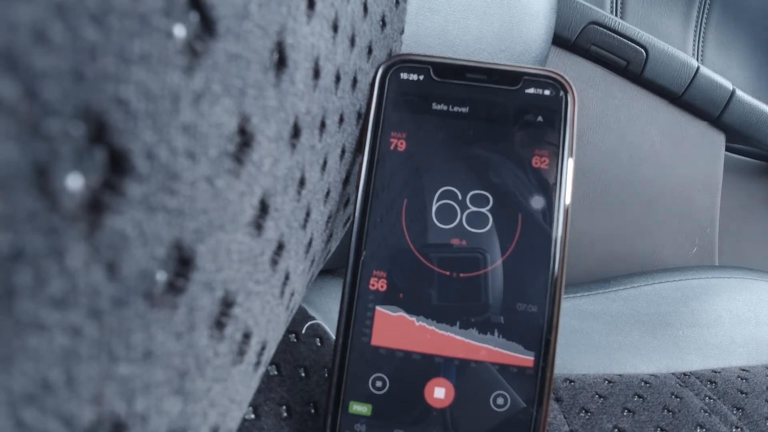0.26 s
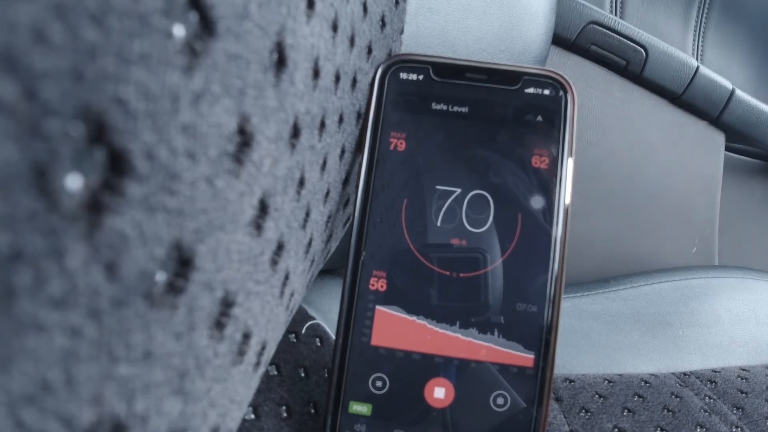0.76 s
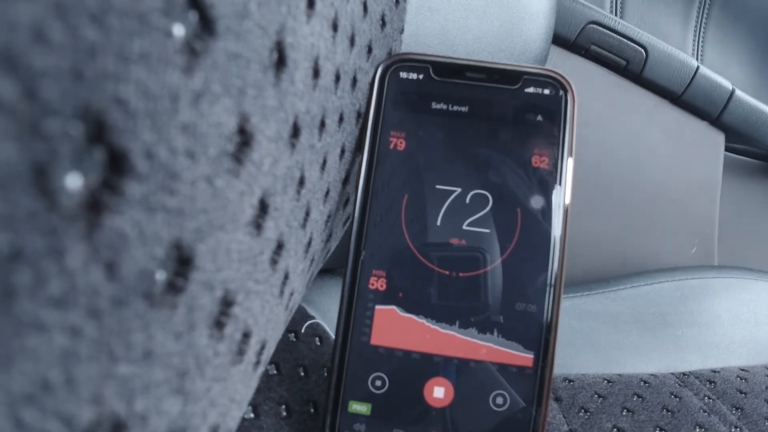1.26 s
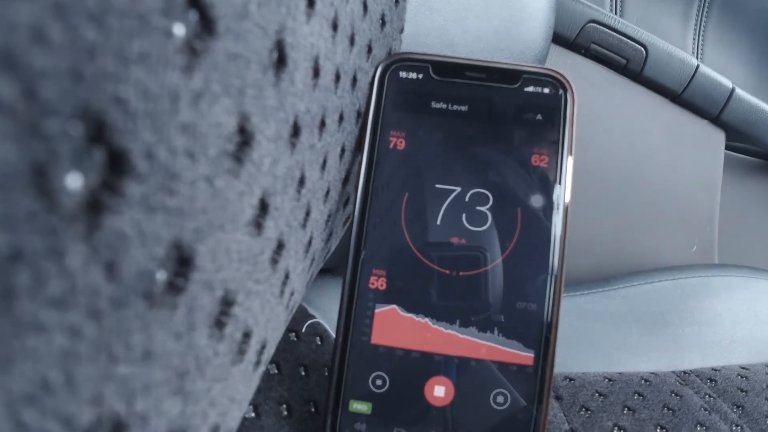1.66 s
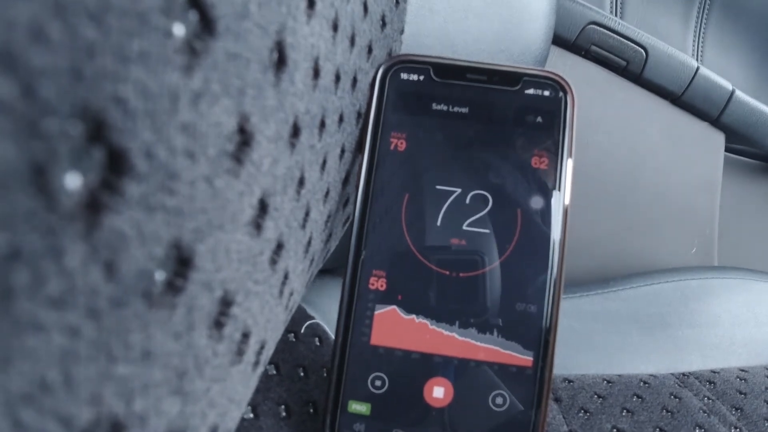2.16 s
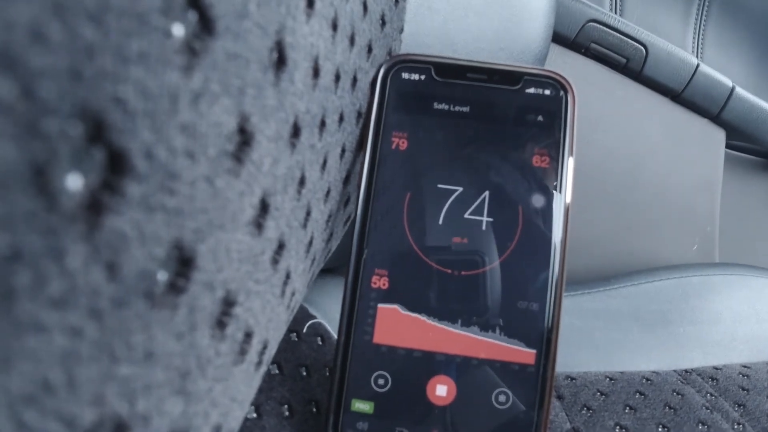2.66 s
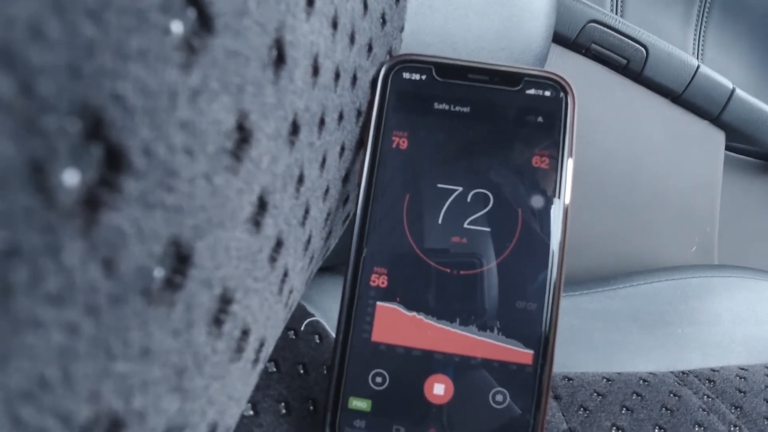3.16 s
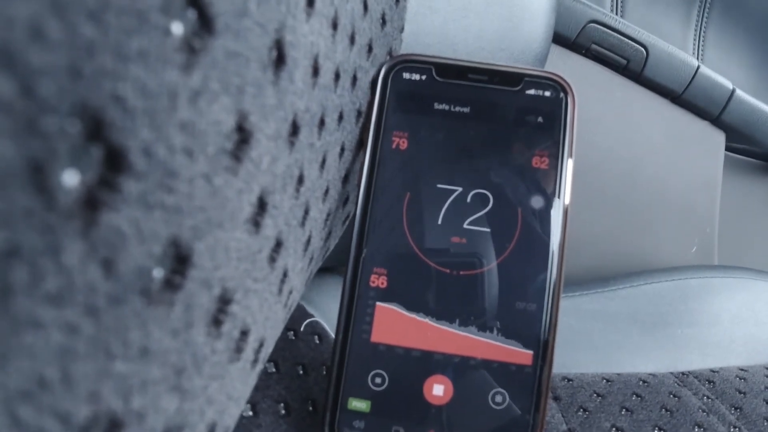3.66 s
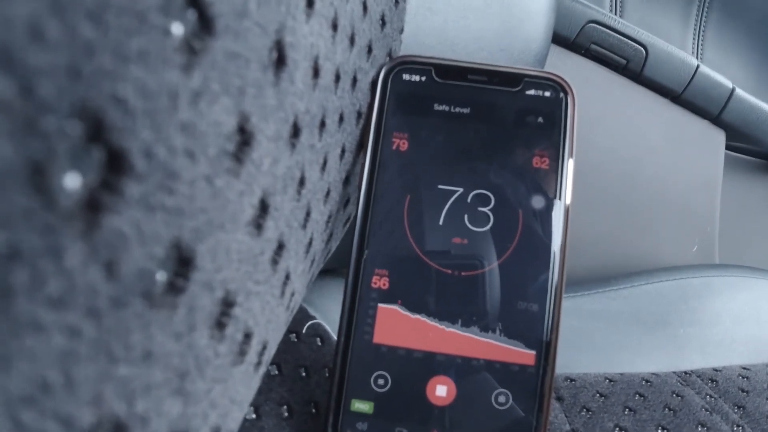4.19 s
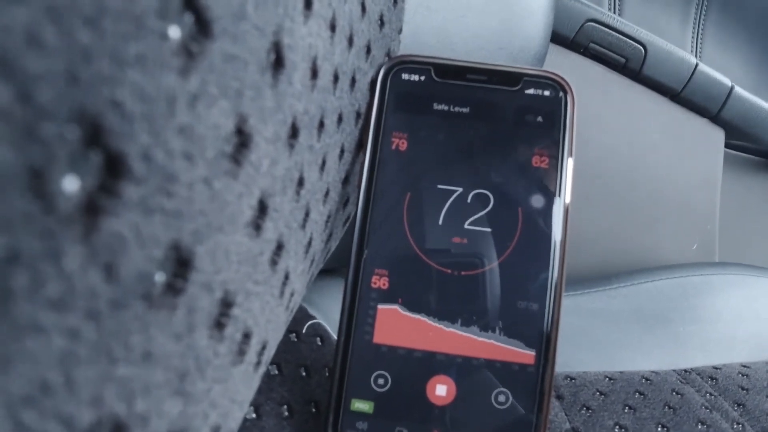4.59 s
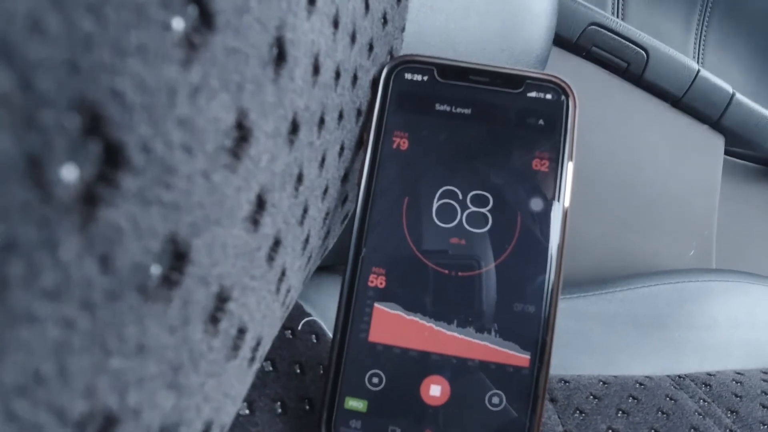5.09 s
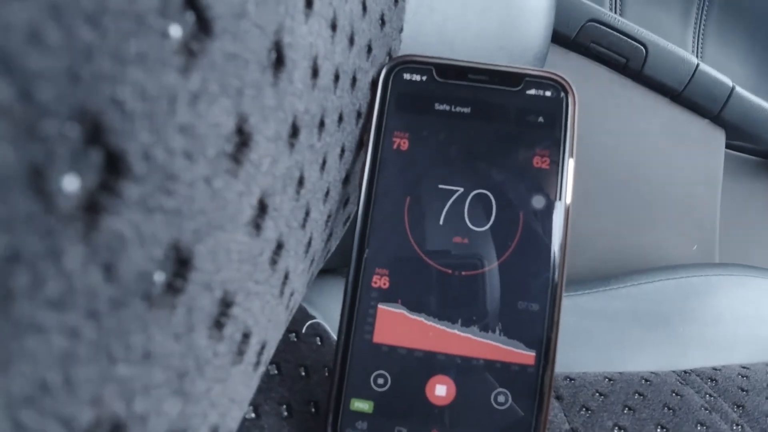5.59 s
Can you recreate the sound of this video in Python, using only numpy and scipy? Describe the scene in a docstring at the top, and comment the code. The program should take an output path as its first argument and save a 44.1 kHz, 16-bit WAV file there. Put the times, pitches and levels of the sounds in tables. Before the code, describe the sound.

Interior of a moving car, microphones resting close to the seat. A deep four-cylinder boom rises in pitch for two seconds, eases down, surges briefly after four seconds and dies away. Tyre rumble and body shake lie beneath. Small dry trim ticks and hollow plastic clacks sound close by; fabric rustling grows later, with the loudest clack near the end.

```python
"""A four-cylinder engine booms through the cabin of a moving car, pulls up, eases off and surges once more:
sine tones on its firing note and overtones. Close to the microphones trim ticks and hollow plastic clacks,
as ringing modes, the loudest clack near the end; something rustles against the seat in grainy noise, and
soft bands of noise swell and fade. Bumps boom as decaying sines, and under all this shaped noise shakes the
body and rumbles as the tyres, with faint wandering tones from the tread."""
import sys
import numpy as np
from scipy import signal
from scipy.fft import rfft, irfft
from scipy.io import wavfile
from scipy.ndimage import uniform_filter1d, minimum_filter1d

SR = 44100
rng = np.random.default_rng(int(sys.argv[2]) if len(sys.argv) > 2 else 0)


def materialize(psi):
    """Save the field psi as 16-bit PCM at rate SR to the path in sys.argv[1].

    A 1-D psi becomes a single channel; in a 2-D psi each row is a channel.
    """
    bounded = np.clip(np.atleast_2d(psi).T, -1, 1)
    quanta = np.round(bounded * 32767).astype(np.int16)
    wavfile.write(sys.argv[1], SR, quanta)


N = 257544
T = np.arange(N) / SR   # time in seconds


def from_db(db):
    """Decibels to gain."""
    return 10 ** (np.asarray(db) / 20)


def rms_one(x):
    """Scale to unit power."""
    return x / np.sqrt(np.mean(x ** 2) + 1e-20)


def in_time(rows):
    """Each column of a curve, read at every sample."""
    s, *columns = np.transpose(rows)
    return [np.interp(T, s, column) for column in columns]


def at_hz(points, hz):
    """Read a spectrum on a log-frequency axis."""
    f, value = np.transpose(points)
    return np.interp(np.log(np.maximum(hz, 1)), np.log(f), value)


def drift(rate_hz):
    """Smooth random wander of spread 1: noise through two equal poles at the given rate."""
    step = 40   # samples between points of the wander
    settle = 2000   # points dropped while the filter settles
    r = np.exp(-2 * np.pi * rate_hz * step / SR)
    noise = rng.standard_normal(N // step + settle + 2)
    slow = signal.lfilter([1], [1, -2 * r, r * r], noise)[settle:]
    return np.interp(np.arange(N) / step, np.arange(len(slow)), rms_one(slow))


def colour(x, spectrum):
    """Give a steady signal a spectrum."""
    gain = from_db(at_hz(spectrum, np.fft.rfftfreq(N, 1 / SR)))
    return irfft(rfft(x) * gain, N)


def resonate(x, hz, width_hz):
    """One resonance with gain 1 on top."""
    r = np.exp(-np.pi * width_hz / SR)
    zeros = np.array([1, 0, -1]) * (1 - r * r) / 2
    poles = [1, -2 * r * np.cos(2 * np.pi * hz / SR), r * r]
    return signal.lfilter(zeros, poles, x + 1e-18)   # the offset avoids slow, vanishingly small numbers


def body(x, modes):
    """Parallel resonances of alternating sign, scaled so that white noise keeps its power."""
    power = sum(np.pi * width * from_db(db) ** 2 / SR for _, width, db in modes)
    total = 0
    for k, (hz, width, db) in enumerate(modes):
        total = total + (-1) ** k * from_db(db) * resonate(x, hz, width)
    return total / np.sqrt(power)


def low_pass(x, hz, order):
    """Dull the top."""
    return signal.sosfilt(signal.butter(order, hz, fs=SR, output="sos"), x)


def white():
    """Unrelated noise for mid and side."""
    return rng.standard_normal((2, N))


def burst(s, rise_s, decay_s):
    """A swell that builds up until time s and dies away, both exponentially."""
    exponent = np.minimum((T - s) / rise_s, (s - T) / decay_s)
    return np.exp(np.maximum(exponent, -40))


def ringing(hz, width_hz):
    """A tone of even strength whose phase wanders, so that it spreads over a width; mid and side."""
    wander = np.cumsum(rng.standard_normal((2, N)), axis=1) * np.sqrt(2 * np.pi * width_hz / SR)
    return np.sqrt(2) * np.sin(2 * np.pi * hz * T + uniform_filter1d(wander, size=50))


def ring_on(force, width_hz):
    """The swing of a mode follows its force and outlasts it, the longer the narrower the mode."""
    r = np.exp(-np.pi * width_hz / SR)
    return signal.lfilter([1 - r], [1, -r], force)


# Engine speed under way. Each row: time in seconds, firings per second.
ENGINE_SPEED = [(0.1, 46.7), (0.38, 46.4), (0.6, 48.1), (0.8, 49.3), (1.0, 55.7), (1.2, 58.6), (1.5, 61.3),
                (2.0, 65.2), (2.15, 66.0), (2.24, 63.8), (2.42, 57.2), (2.7, 56.7), (2.9, 53.8),
                (3.1, 52.3), (3.5, 51.1), (3.9, 50.5), (4.08, 51.7), (4.28, 58.0), (4.42, 59.6),
                (4.55, 57.6), (4.87, 49.1), (5.1, 48.7), (5.4, 47.5)]
# Boom of the firing note in the cabin. Each row: time in seconds, level in dB before the waver.
BOOM_LEVEL = [(0.1, -24.5), (1.2, -20), (2.71, -22), (2.85, -27), (2.96, -22.5), (4.19, -25), (4.22, -33),
              (4.26, -19), (4.48, -24.5), (4.83, -24.5), (4.9, -28.5), (5.45, -29), (5.5, -31),
              (5.63, -43.5), (5.74, -44), (5.84, -72)]
# Engine load, steering the overtones. Each row: time in seconds, load in dB.
ENGINE_LOAD = [(0.15, -32.5), (0.27, -32.5), (2.78, -35.5), (3.37, -35), (3.45, -39), (4.08, -38.5),
               (4.16, -34.5), (4.47, -34.5), (4.66, -35.5), (4.86, -48), (5.75, -49.5)]
# Engine orders; quarter steps come from unequal cylinders.
# Each row: multiple of the firing rate, relative level in dB, dB gained per dB of load.
ENGINE_ORDERS = [(1.25, 4.5, 2.5), (1.75, -4.5, 0.5), (2, 1, 2.7), (2.25, 0.9, 2.2), (2.5, -21.5, -0.5),
                 (2.75, -6.5, 3.2), (3, -6, 2.54), (3.25, -14.5, 1.5), (3.5, -21.5, -0.5),
                 (3.75, -19.5, -0.5), (4, -13, 2.04), (4.25, -23.5, 6), (4.75, -25.5, 1), (5, -18.5, 0.46),
                 (5.25, -26.5, 1), (5.75, -32.5, 2), (6, -24.5, 1.2), (6.25, -31, 0), (6.5, -32, 0),
                 (6.75, -30, 0), (7.25, -31, 0.5), (9, -32, 3), (12, -33.5, 1.4)]
# Cabin air resonances that lift the orders passing through.
# Each row: centre in Hz, width in Hz, lift at the centre in dB.
CABIN_RESONANCES = [(88.6, 24, 6.5), (156.1, 20, 11), (215, 27, 7), (249, 18, 11.5), (365, 30, 4.5)]


def engine(overtones_db=-40.0, boom_waver_db=1.02, cruising_load_db=-33):
    """The firing note and its orders; low orders lock into one throb per four firings, whose lows arrive last."""
    roughness, wavers_per_s = .05, 6
    coasting_load_db = -41   # below this load the orders fade out
    lag_per_order, middle_order = 1.3, 3.5   # lag in firings
    top_locked_order, slip_rad = 3.3, 0.7   # higher orders run free; the lock loosens with speed
    firing_hz, = in_time(ENGINE_SPEED)
    boom_db, = in_time(BOOM_LEVEL)
    load_db, = in_time(ENGINE_LOAD)
    angle = 2 * np.pi * np.cumsum(firing_hz) / SR
    boom = from_db(boom_db + boom_waver_db * drift(wavers_per_s)) * np.sin(angle)
    speed_rise = firing_hz / firing_hz.min() - 1
    growl = 0
    for multiple, db, db_per_load_db in ENGINE_ORDERS:
        order_hz = multiple * firing_hz
        lift_db = sum(top_db / (1 + (2 * (order_hz - hz) / width) ** 2)
                      for hz, width, top_db in CABIN_RESONANCES)
        phase = multiple * angle + np.pi * lag_per_order * (multiple - middle_order) ** 2
        phase = phase + slip_rad * drift(0.98) * speed_rise
        phase = phase + 2 * np.pi * rng.random() * (multiple > top_locked_order)
        gain = from_db(overtones_db + db + lift_db + db_per_load_db * (load_db - cruising_load_db))
        steady = (1 + roughness * drift(0.56)) * np.sin(phase)
        rough = roughness * drift(12) * np.cos(phase)
        growl = growl + gain * (steady + rough)
    coasting_fade = from_db(np.minimum(load_db - coasting_load_db, 0))
    return np.sqrt(2) * (boom + growl * coasting_fade)


# Road bumps felt through the whole car. Each row: time in seconds, level in dB.
ROAD_BUMPS = [(4.25, -28), (4.558, -25), (4.819, -23), (5.239, -24), (5.583, -25)]


def bumps():
    """Each bump sets the body booming softly for a few cycles."""
    body_hz, rise_s, decay_s = 45.35, .004, 0.06
    peak_delay_s = 0.0068
    booms = 0
    for s, db in ROAD_BUMPS:
        swing = np.sin(2 * np.pi * body_hz * (T - s))
        booms = booms + from_db(db) * burst(s + peak_delay_s, rise_s, decay_s) * swing
    return low_pass(booms, 400, order=2)


def faint_ticks(count=10):
    """Weak touches at random moments, in the columns of the clear ticks."""
    level_db, spread_db = -68, 4
    return [(rng.uniform(0, N / SR), rng.normal(level_db, spread_db), 0) for _ in range(count)]


# The clearest trim ticks, near the microphones.
# Each row: time in seconds, relative level in dB, brightness in dB per octave.
CLEAR_TICKS = [(0.06, -62.5, -4.5), (0.2565, -55, 2), (0.279, -56, 0.5), (0.304, -65, -6), (0.324, -67, 9),
               (0.3435, -59, -1.5), (0.387, -52.5, -8.5), (0.408, -67.5, 7), (0.4295, -55, 1.5),
               (0.531, -58, 3), (0.563, -64.5, -9.5), (0.6135, -63.5, -1.5), (0.7223, -61.5, 0),
               (0.738, -64, -8), (0.7816, -56, 2.5), (0.803, -62, 5.5), (0.826, -61, -3.5), (0.848, -65, 3),
               (0.886, -58, -4), (0.9648, -54, -6.5), (0.992, -66.5, 5), (1.106, -66, 7),
               (1.151, -51.5, -1), (1.194, -65.5, 2), (1.238, -53, -7), (1.282, -64.5, 1),
               (1.323, -63.5, 7.5), (1.378, -49.5, -8), (1.4212, -51.5, -3.5), (1.471, -65.5, 9),
               (1.695, -55, 12.5), (1.704, -58, 3), (1.722, -65, -13), (2.881, -54.5, 9.5), (2.887, -55, 7),
               (2.921, -55, -4), (2.928, -59, -8), (2.947, -58, 3), (2.9755, -53, -5), (3.001, -58.5, -8.5),
               (3.025, -64.5, 2), (3.844, -61, 2.5), (4.084, -49, -3.5), (4.14, -54, 6), (4.361, -48, 2.5),
               (4.57, -50, -8.5), (4.62, -51, -2), (4.712, -47.5, -3), (5.011, -45.5, 5.5), (5.182, -43, 8),
               (5.23, -58.5, -1.5), (5.319, -54, 2.5), (5.427, -59, -2), (5.637, -48, 6), (5.695, -54, -1)]
# Modes of the trim panels, which also creak under the rubs.
# Each row: centre in Hz, width in Hz, relative level in dB.
TRIM_PANEL_MODES = [(1500, 270, -11.5), (1800, 250, -11), (2247, 100, -2.5), (2530, 160, -6),
                    (2720, 300, -10), (3238, 110, 0), (3770, 560, -9), (4250, 450, -11.5)]


def ticks(level_db=-7, tail_db=-16, vary_db=1.5, dry_db=-17, pivot_hz=2900, lag_s_per_octave=.0015):
    """Trim touches in brief ticks with a weak rebound; low modes cross the panel more slowly and arrive later."""
    rise_s, decay_s, peak_delay_s = .001, .004, 0.0017
    rebound_s, tail_s = 0.013, 0.016   # delay and decay of the rebound
    touches = CLEAR_TICKS + faint_ticks()
    shapes = []
    for s, db, _ in touches:
        touch = burst(s + peak_delay_s, rise_s, decay_s)
        rebound = from_db(tail_db) * burst(s + rebound_s, rise_s, tail_s)
        shapes.append(from_db(db + level_db) * (touch + rebound))
    shapes = np.array(shapes)
    brightness = np.array(touches)[:, 2]
    favour_db = rng.normal(0, vary_db, (len(touches), len(TRIM_PANEL_MODES)))   # each tick favours other modes
    rings = 0
    for k, (hz, width, db) in enumerate(TRIM_PANEL_MODES):
        octaves = np.log2(hz / pivot_hz)
        strength = from_db(db + favour_db[:, k] + brightness * octaves) @ shapes
        arriving = np.interp(T + lag_s_per_octave * octaves, T, strength)
        rings = rings + ring_on(arriving, width) * ringing(hz, width)
    contact = from_db(dry_db) * shapes.sum(axis=0) * rms_one(resonate(white(), 2200, 2200))
    return low_pass(rings / np.sqrt(2) + contact, 4600, order=10)


# Hollow plastic clacks, nearby. Each row: time of the peak in seconds, level in dB, rise in seconds,
# decay in seconds, scrape relative to the clack in dB.
PLASTIC_CLACKS = [(1.7, -50.5, .0025, 0.011, -5), (1.958, -57, 0.0047, 0.013, -0.5),
                  (1.98, -58, 0.0053, .01, 2), (2.003, -56, 0.006, 0.01, -4.5),
                  (2.058, -49.5, 0.0039, 0.0061, -12), (2.432, -61.5, .007, 0.017, 6),
                  (2.473, -66, 0.0047, .01, -2), (2.552, -59.5, .008, 0.0086, -2),
                  (2.599, -52, 0.0055, 0.011, -7), (2.646, -58.5, 0.0052, 0.0074, -2),
                  (2.668, -60.5, 0.0035, 0.008, -12), (2.918, -62, .004, 0.0059, -2.5),
                  (2.942, -59, .004, 0.009, -3), (2.995, -62, 0.004, 0.0082, 0),
                  (4.223, -52.5, 0.0082, 0.042, -5), (4.318, -58, 0.0037, 0.013, -14),
                  (4.495, -52.5, 0.0071, 0.0065, -14.5), (5.213, -59, .005, 0.014, -7),
                  (5.388, -61, .006, 0.0097, -3), (5.493, -59, 0.0042, 0.015, 8),
                  (5.522, -65.5, .008, 0.024, -3), (5.586, -43.5, 0.0069, 0.013, -3.5)]
# Modes of the hollow plastic when struck. Each row: centre in Hz, width in Hz, relative level in dB.
STRUCK_PLASTIC_MODES = [(790, 96, -6.5), (863, 48, -2.5), (951, 46, 8), (1154, 43, -5.5), (1364, 200, -5),
                        (1565, 61, -5.5), (1930, 60, -17), (3380, 400, -31.5)]


def clacks(thud_db=-13, thud_hz=800, scrape_top_hz=1600, grain_db=-1.0, vary_db=1.0):
    """Hollow plastic slides into contact, thuds and rings briefly; a glancing blow also scrapes."""
    forces = np.array([from_db(db) * burst(s, rise_s, decay_s)
                       for s, db, rise_s, decay_s, _ in PLASTIC_CLACKS])
    forces = forces * rms_one(from_db(grain_db * drift(220)))   # the surfaces grate as they meet
    shares = np.array([from_db(db) * np.sqrt(width) for _, width, db in STRUCK_PLASTIC_MODES])
    favour = from_db(rng.normal(0, vary_db, (len(PLASTIC_CLACKS), len(shares))))   # each blow favours other modes
    strengths = shares / np.linalg.norm(shares) * favour
    rings = sum(strengths[:, k] @ forces * ringing(hz, width)
                for k, (hz, width, _) in enumerate(STRUCK_PLASTIC_MODES))
    thud = from_db(thud_db) * forces.sum(axis=0) * rms_one(resonate(white(), thud_hz, thud_hz))
    scrape_force = from_db([row[-1] for row in PLASTIC_CLACKS]) @ forces
    scrape = scrape_force * low_pass(body(white(), RUBBED_PLASTIC_MODES), scrape_top_hz, order=8)
    return low_pass(rings + thud, 4500, order=8) + scrape


# Rubs against the seat, each a swell and a fade. Each row: time of the peak in seconds, rustle in dB,
# hollow scuff in dB, rise in seconds, fade in seconds (rise and fade are of the amplitude before squaring).
SEAT_RUBS = [(0.621, -86.5, -65, 0.19, 0.36), (0.78, -88.5, -73.5, 0.072, 0.074),
             (1.41, -73, -60.5, 0.054, 0.071), (1.9, -78.5, -73.5, 0.02, 0.081),
             (2.045, -66, -65.5, 0.062, 0.066), (2.498, -69, -65.5, 0.042, 0.15),
             (2.57, -72, -69, .03, .05), (2.645, -70.5, -63, 0.045, .045), (2.93, -71, -74, 0.075, 0.085),
             (3.35, -74, -83, 0.11, 0.12), (4.06, -74, -92.5, 0.19, 0.22), (4.225, -68.5, -79, 0.027, 0.1),
             (4.3, -64, -67, 0.077, 0.16), (4.51, -65, -61, 0.051, 0.1), (4.62, -62.5, -60, 0.1, 0.1),
             (4.78, -67.5, -81.5, 0.083, 0.11), (4.92, -66, -84, 0.077, 0.11),
             (5.02, -63.5, -90, 0.07, 0.16), (5.214, -60, -58.5, 0.048, 0.056),
             (5.44, -66.5, -72, 0.078, 0.16), (5.603, -57.5, -72, 0.03, 0.054),
             (5.7, -64, -78, 0.056, 0.027), (5.8, -72.5, -81, 0.047, 0.076)]
# Spectrum of the fabric rustle, close up. Each row: frequency in Hz, relative level in dB per Hz.
RUSTLE_SPECTRUM = [(1000, -6.5), (1900, -8), (2400, -5), (3400, -7), (4600, -8), (5400, -21), (7000, -29.5),
                   (7900, -20.5), (8700, -7), (9700, -15), (10800, -23), (11600, -33.5), (14000, -27)]
# Hollow plastic under a rub, also heard in the scrape of the clacks.
# Each row: centre in Hz, width in Hz, relative level in dB.
RUBBED_PLASTIC_MODES = [(936, 51, 5), (1290, 600, -0.5), (1430, 260, -5.5)]


def rubbing(creak_db=-84.0, creak_growth=0.51, grain_db=1.5, catch_db=2.5, creaks_per_s=170):
    """Fabric catches and slips in tiny grains; the rubs also make the trim creak and sound the hollow plastic."""
    resting_rustle_db = -90   # the fabric never lies quite still
    grate_s = 0.0095   # each slip grates for a moment
    swells = np.array([burst(s, rise_s, fade_s) ** 2 for s, _, _, rise_s, fade_s in SEAT_RUBS])
    rub_powers = from_db(np.transpose(SEAT_RUBS)[1:3]) ** 2
    rustle_power, scuff_power = rub_powers @ swells   # overlapping rubs add in power
    rustle_db = 10 * np.log10(rustle_power + from_db(resting_rustle_db) ** 2)
    grains = white() * from_db(grain_db * drift(290) + catch_db * drift(33))
    rustle = from_db(rustle_db) * rms_one(colour(grains, RUSTLE_SPECTRUM))

    slips = (rng.random(N) < creaks_per_s / SR) * 1.
    slips = signal.lfilter([1], [1, -np.exp(-1 / (grate_s * SR))], slips + 1e-18)
    firmness_db = rustle_db - np.median(rustle_db)   # creaks grow more slowly with pressure than the rustle
    creak_tone = rms_one(low_pass(body(slips * white(), TRIM_PANEL_MODES), 4200, order=10))
    creaks = from_db(creak_db + creak_growth * firmness_db) * creak_tone

    scuff = np.sqrt(scuff_power) * low_pass(body(white(), RUBBED_PLASTIC_MODES), 1520, order=10)
    return rustle + creaks + scuff


# Soft bands of noise: panel groans and squeaks, road hiss, low engine growl. Each row: time of the peak
# in seconds, level in dB, pitch in Hz, width in Hz, rise in seconds, decay in seconds.
SOFT_NOISES = [(0.09, -70, 1410, 260, 0.037, .035), (0.51, -71.5, 1513, 220, 0.041, 0.032),
               (1.9, -74, 2620, 80.9, 0.0092, 0.029), (2.28, -71, 1304, 220, 0.15, 0.13),
               (4.236, -60, 1610, 776, 0.019, 0.019), (4.309, -68, 2140, 110, 0.026, 0.045),
               (4.245, -47, 408, 222, .012, .02), (4.302, -43, 286, 50, 0.024, 0.024),
               (3.85, -50.5, 132, 77.5, .08, 0.066), (4.33, -57, 720, 323, 0.062, 0.077),
               (4.53, -50.5, 322, 129.5, 0.012, .03), (4.655, -52, 426, 202, 0.033, 0.04),
               (5.145, -48.5, 394, 180, 0.018, 0.03), (5.212, -46.5, 383, 150, 0.033, 0.03),
               (5.36, -54, 370, 90, 0.049, .025), (5.595, -51.5, 436, 268, 0.024, 0.035),
               (5.59, -53.5, 820, 175, 0.013, .02), (5.7, -47.5, 166, 87, 0.59, 0.54)]


def soft_noises():
    """Each swell of noise fills one band with steep flanks."""
    out = 0
    for s, db, hz, width, rise_s, decay_s in SOFT_NOISES:
        edges = [hz - width / 2, hz + width / 2]
        band = signal.sosfilt(signal.butter(3, edges, "band", fs=SR, output="sos"), white())
        out = out + from_db(db) * burst(s, rise_s, decay_s) * rms_one(band)
    return out


# Unevenness of the road, felt as body shake. Each row: time in seconds, relative level in dB.
ROAD_UNEVENNESS = [(0.04, -45.5), (0.09, -37.5), (2.09, -31.5), (2.24, -47.5), (2.43, -28), (2.74, -43.5),
                   (3.42, -29), (3.48, -37), (5.0, -30.5), (5.6, -41.5), (5.84, -56)]
# Spectrum of the body shake. Each row: frequency in Hz, relative level in dB per Hz.
SHAKE_SPECTRUM = [(10, -18), (18, -1), (27, 3), (34, 1), (44, -7), (60, -16), (90, -32), (200, -60),
                  (1000, -140)]


def shake(level_db=1):
    """The body wobbles on its springs, at a strength set by the road surface."""
    jolt_db, = in_time(ROAD_UNEVENNESS)
    wobble = colour(white(), SHAKE_SPECTRUM)
    wobble = wobble / np.sqrt(uniform_filter1d(wobble ** 2, size=7000))   # even out its own swells
    return from_db(jolt_db + level_db) * wobble


# Tyre roar from under the floor. Each row: time in seconds, relative level in dB.
TYRE_LEVEL = [(0.05, -61), (0.4, -59), (2.11, -58.5), (3.05, -65), (3.92, -65.5), (4.49, -63),
              (4.84, -65.5), (5.84, -68)]
# Spectrum of the tyre roar inside the cabin. Each row: frequency in Hz, relative level in dB per Hz.
TYRE_SPECTRUM = [(50, 8.5), (100, 16), (165, 10.5), (230, 6.5), (300, -3), (350, 0.5), (400, -5), (470, -6),
                 (560, -12), (650, -11.5), (800, -13), (865, -18.5), (960, -18), (1070, -26), (1200, -24.5),
                 (1520, -29.5), (1750, -31.5), (2050, -37), (2300, -35.5), (2700, -41), (4200, -45),
                 (6500, -67.5)]
# Faint tones of the tread. Each row: frequency in Hz, mean level in dB.
TREAD_TONES = [(338, -69), (490, -72), (657, -77), (980, -76)]


def tyres(level_db=19.0, patchy_db=0.85):
    """The tyres roar, and the tread sings in faint strands that wander in pitch and come and go."""
    wander, fade_db = .015, 2.5   # wander as a share of the pitch
    tyre_db, = in_time(TYRE_LEVEL)
    roar = from_db(level_db + tyre_db + patchy_db * drift(36)) * rms_one(colour(white(), TYRE_SPECTRUM))
    follow_db = .5 * (tyre_db - tyre_db.mean())   # the strands follow the roar by half
    for hz, db in TREAD_TONES:
        phase = 2 * np.pi * np.cumsum(hz * (1 + wander * drift(1.0))) / SR
        strand = drift(20) * np.sin(phase) + drift(22) * np.cos(phase)
        roar[0] += from_db(db + fade_db * drift(4.7) + follow_db) * strand   # mid only
    return roar


# Stereo width at the microphones. Each row: frequency in Hz, gain of the side signal in dB.
STEREO_WIDTH = [(30, -16), (60, -5), (125, -19), (300, -34), (670, -22), (1220, -10), (2000, 0), (3200, 0),
                (4200, 5), (5500, 1), (7400, -2), (8700, -6), (10500, -5), (12000, -16)]


def scene():
    """The bass of engine and bumps fills the cabin evenly; small near sounds spread wide."""
    mid, side = shake() + tyres() + soft_noises() + rubbing() + ticks() + clacks()
    mid = mid + engine() + bumps()
    side = colour(side, STEREO_WIDTH)
    return np.array([mid + side, mid - side])


def record(dry):
    """A limiter holds down the strongest booms; then the top is cut."""
    limit = .22   # highest peak before the cut, share of full scale
    cutoff_hz = 14100
    allowed = np.minimum(1, limit / (np.abs(dry).max(axis=0) + 1e-9))
    gain = uniform_filter1d(minimum_filter1d(allowed, size=1300), size=1300)
    return signal.sosfilt(signal.cheby2(12, 70, cutoff_hz, fs=SR, output="sos"), dry * gain)


dry = scene()
out = record(dry)
materialize(out)
```